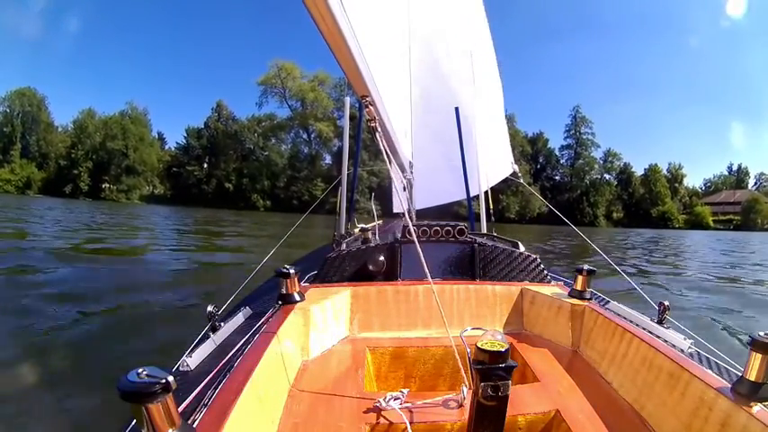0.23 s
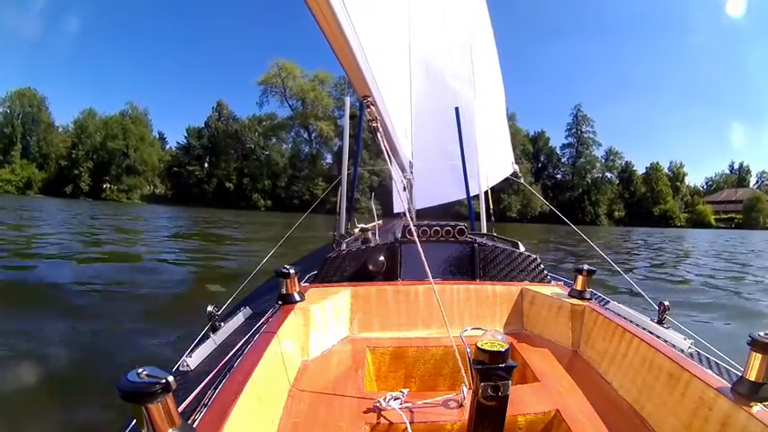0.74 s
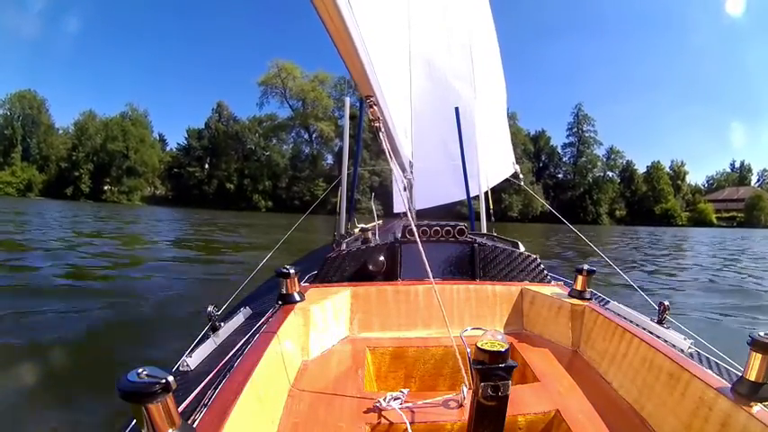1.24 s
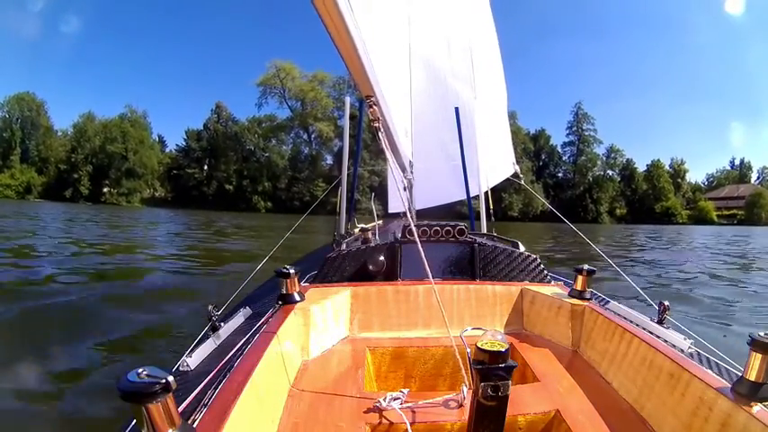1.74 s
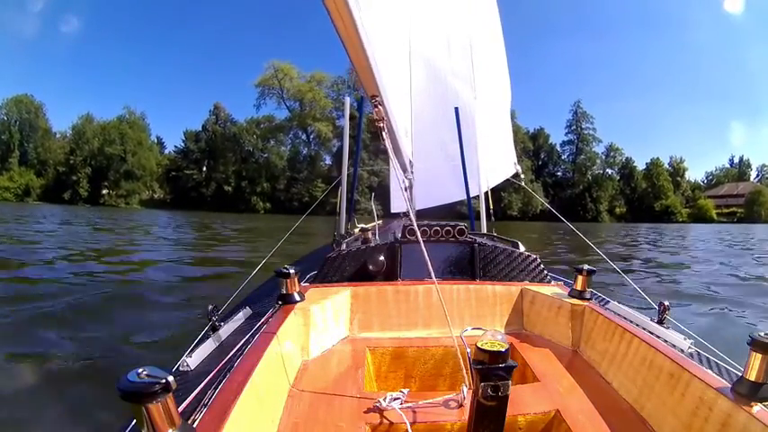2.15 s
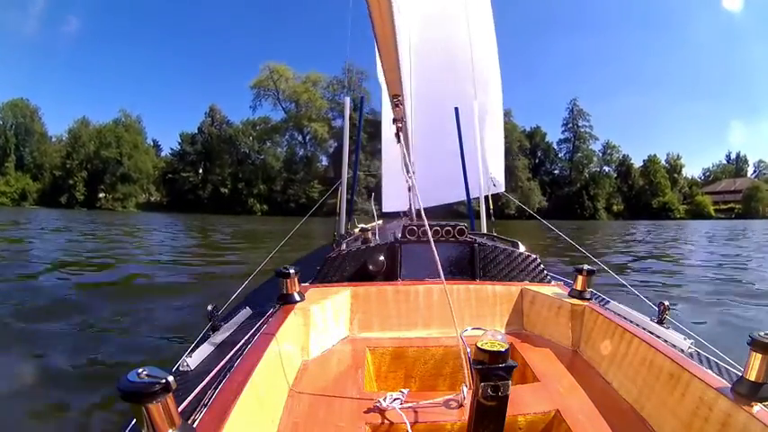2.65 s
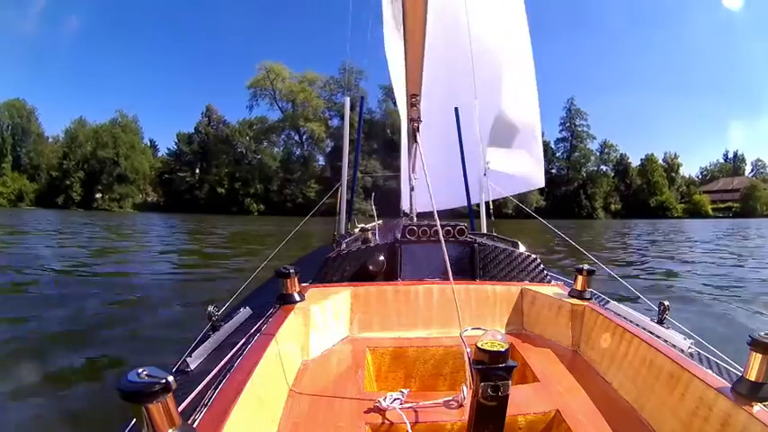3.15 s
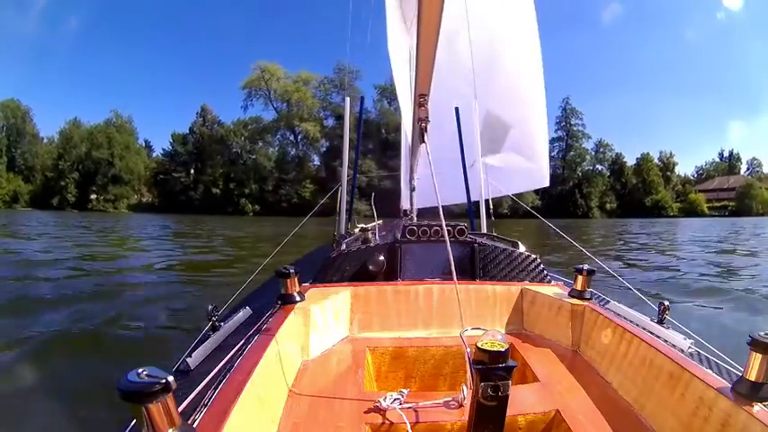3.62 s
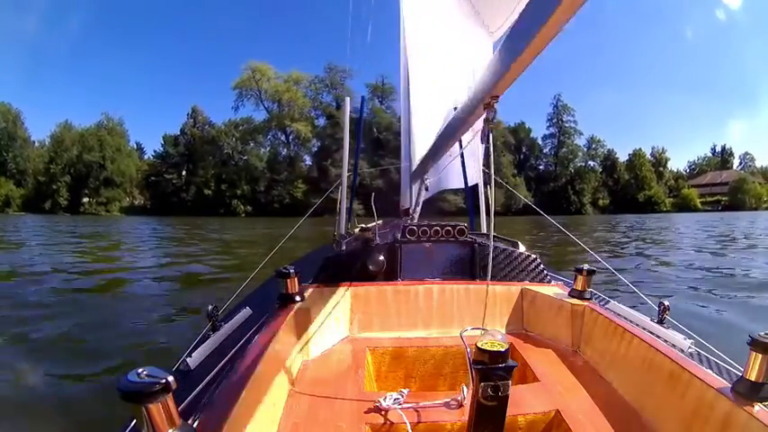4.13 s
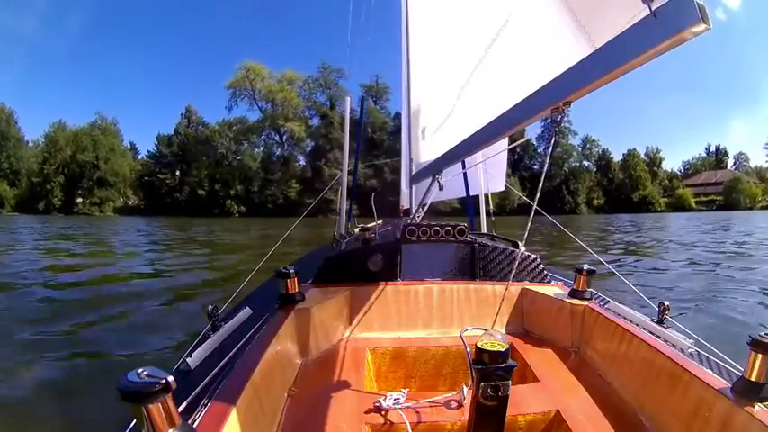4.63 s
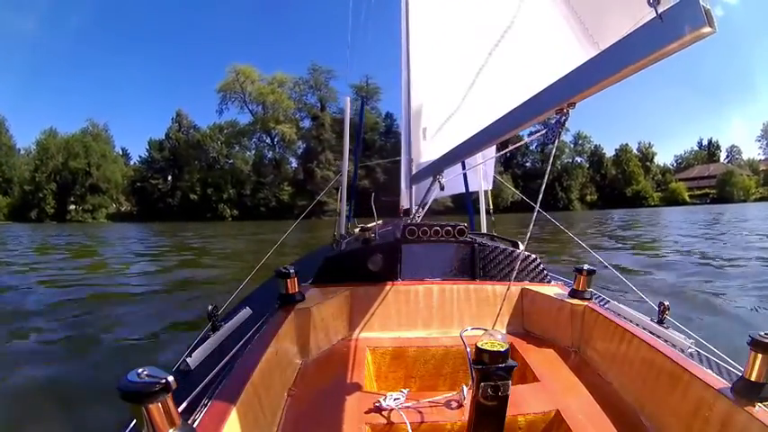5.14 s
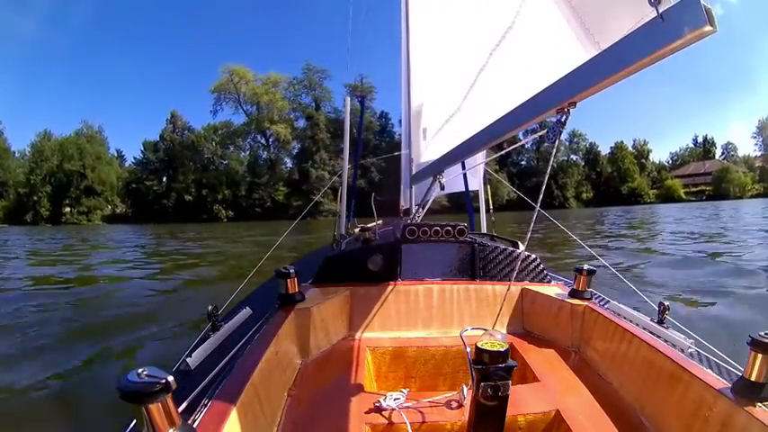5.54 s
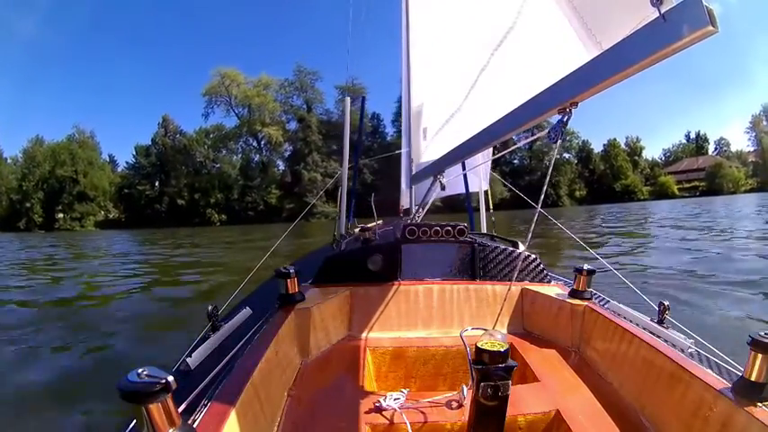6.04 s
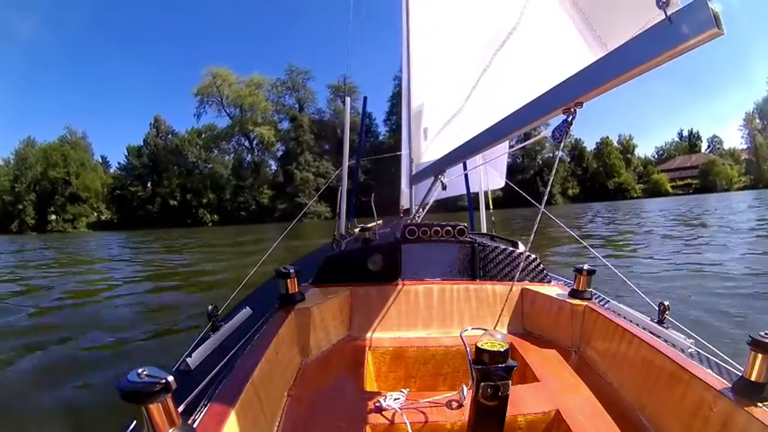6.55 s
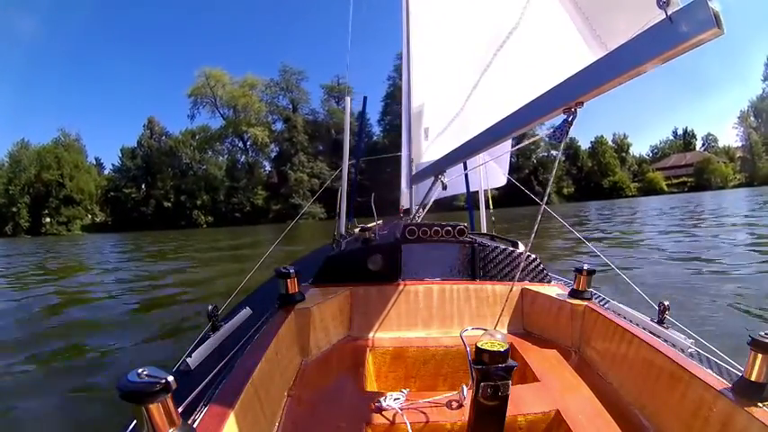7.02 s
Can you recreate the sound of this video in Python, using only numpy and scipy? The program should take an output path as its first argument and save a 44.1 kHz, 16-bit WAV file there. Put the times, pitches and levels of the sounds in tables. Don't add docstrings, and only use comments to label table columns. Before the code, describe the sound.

Outdoors on a lake, close hull-borne sound: soft low water, thin hiss, one early rigging knock. A gritty geared motor buzzes in surges with quick plastic ticking while the rigging rattles, until the boom slams. It winds down, hunts in evenly spaced little jolts with one longer nudge, rests briefly, then pulls in with a high mesh whine, a stub, and a last cut-off burst.

```python
import sys
import numpy as np
from scipy import signal
from scipy.fft import rfft, irfft, next_fast_len
from scipy.io import wavfile
from scipy.ndimage import uniform_filter1d, map_coordinates

SR = 44100
rng = np.random.default_rng(int(sys.argv[2]) if len(sys.argv) > 2 else 0)


def wav_record(signal):
    frames = np.transpose(np.atleast_2d(signal))
    bounded = np.clip(frames, -1, 1)
    quanta = np.round(bounded * 32767).astype(np.int16)
    wavfile.write(sys.argv[1], SR, quanta)


def amplitude_ratio(level_db):
    exponent = np.asarray(level_db, float) / 20
    return 10 ** exponent


N = 321048
T = np.arange(N) / SR

# frequency in Hz, density in dB per Hz.
LAKE_COLOUR = [(15, -32), (25, -6), (55, 2), (107, -0.5), (210, -6.5), (290, -4.5), (323, -9), (458, -12.5),
               (600, -15.5), (1150, -16.5), (1310, -19), (15600, -35)]
# time in seconds, level in dB.
LAPPING = [(0, -51.5), (.4, -53), (.8, -54.5), (1.2, -55), (5.7, -53.5), (6, -55), (7.28, -54)]
# frequency in Hz, level in dB.
CAMERA_WHISTLE = [(14104, -100)]
# start in seconds, crack peak in dB, panel re crack in dB,
# crack t60 in seconds.
JOLTS = [(0.308, -48.5, 1, 0.055), (.58, -32.5, -45, 0.015), (0.585, -33, -14, 0.053),
         (5.625, -46.5, 8, 0.045), (2.418, -25, -12, 0.023), (2.503, -21, -11, 0.038),
         (2.767, -20.5, -26.5, 0.044), (2.906, -21.5, -38, 0.028), (2.976, -20.5, -20, 0.039),
         (3.027, -16.5, -31, 0.016), (3.239, -20, -24, 0.042), (3.419, -23, -13, 0.23),
         (6.884, -47, -20, .04), (3.578, -32, -1, 0.045), (3.642, -26, -14, 0.067),
         (3.872, -8.5, -17.5, 0.018), (3.876, -11, -20, 0.015), (3.882, -23.5, 0, 0.055),
         (4.225, -26, -19, .03), (6.173, -31, -24, 0.25), (7.065, -38, -17, 0.034), (3.964, -38, -22, 0.03),
         (4.286, -46, -28, 0.027), (4.806, -49, -8.5, 0.047), (4.987, -44, -20, 0.025),
         (5.276, -30.5, -20, 0.048), (5.337, -28, -2.5, 0.11), (5.915, -46.5, -1, 0.054),
         (6.679, -35, -8.5, 0.021), (7.088, -19, -30, 0.027)]

# centre in Hz, width in Hz, level in dB.
HULL_MODES = [(101, 25, 0)]
# centre in Hz, width in Hz, level in dB.
ROCKING_MODES = [(40.3, 51, 0)]
# centre in Hz, width in Hz, level in dB.
PANEL_MODES = [(136, 59, -4.5), (208, 32, -3.5), (256, 41.3, 3.5), (292, 63, -7), (336.4, 53, -11.5)]
# centre in Hz, width in Hz, level in dB.
DECK_MODES = [(334.5, 21.5, -1), (425, 28, -5.5), (653, 180, -9.5), (807, 53, -11.5), (898, 86, -3.5),
              (1146, 153, 1.5), (1390, 142, 0), (1573, 43, -6.5)]
# centre in Hz, width in Hz, level in dB.
MOUNT_MODES = [(1797, 214, -3), (1995, 123, -3), (2129, 54.6, -3.5), (2264, 98, -16)]
# centre in Hz, width in Hz, level in dB.
CASE_MODES = [(2926.3, 123, 2), (3330, 55, -3), (3740, 87, 0.5), (4290, 330, -9.5)]
# centre in Hz, width in Hz, level in dB.
RING_MODES = [(3392, 300, 0.5), (4150, 77, 11.5), (4860, 530, -4), (5804, 210, 3.5), (6440, 190, -11)]
# centre in Hz, width in Hz, level in dB.
SNAP_MODES = [(7870, 1080, -10), (10100, 1250, -14), (11365, 430, -7)]

# time in seconds, turns done.
EASING = [
    [(2.008, -1.1), (2.1003, 0), (2.1736, 2), (2.2371, 4), (2.3657, 9), (2.4772, 13), (2.604, 17),
     (2.6805, 19), (2.765, 21)],
    [(2.8183, 22), (2.9389, 25), (3.002, 27), (3.1091, 31), (3.1696, 33), (3.3738, 39), (3.4553, 41)],
    [(3.8308, 47), (3.9762, 49), (4.0427, 50), (4.1606, 52), (4.2855, 54), (4.3597, 56), (4.4571, 58),
     (4.495, 58.6), (4.56, 58.8)],
]
# time in seconds, turns done.
NUDGE = [(5.215, .3), (5.2731, 1), (5.3455, 2), (5.4424, 3), (5.48, 3.3)]
# time in seconds, turns done.
HAULING = [
    [(6.172, .1), (6.2453, 1), (6.2748, 2), (6.299, 3), (6.4567, 10), (6.5295, 13), (6.5952, 15),
     (6.645, 15.6), (6.7, 15.66)],
    [(6.712, .5), (6.7372, 1), (6.7755, 2), (6.83, 2.9), (6.96, 2.97)],
    [(7.054, .85), (7.0642, 1), (7.108, 2), (7.1438, 3), (7.261, 8), (7.3, 9.7)],
]
# grind in dB, upper resonance re grind in dB, motor in dB, hum in dB.
LOADS = [
    (-34.5, -6, -34.5, -36.5),
    (-31, -6.5, -35, -34.5),
    (-37, -4, -34.5, -37.5),
    (-41, -5.5, -36, -41.5),
    (-36.5, -3.5, -33, -34),
]
GRIND_POWERS = [0.97, 1.43, 0.83, 0.99, 1.04]
# multiple of the shaft, level in dB.
MOTOR_ORDERS = [(4.999, -14), (6.75, -1)]
# multiple of the shaft, level in dB.
MESH_ORDERS = [(21, -30), (29, -25)]
# centre in seconds, level in dB, half length in seconds, pitch in Hz.
SWINGS = [(2.039, -31, 0.01, 101), (2.168, -35.5, 0.047, 100), (2.287, -38, 0.016, 101.5),
          (2.356, -31.5, 0.024, 100.7), (2.396, -41, 0.0154, 102), (2.636, -39, 0.06, 100.4),
          (3.02, -35.5, 0.044, 95.8), (3.116, -26.5, 0.027, 99.3), (3.277, -25.5, 0.035, 102.8),
          (3.504, -31, 0.012, 96.5), (3.647, -37, 0.013, 101), (3.728, -34.5, 0.0128, 100.3),
          (3.786, -27.5, 0.0091, 100.7), (3.903, -18.5, 0.0083, 104.3), (3.95, -27, 0.0245, 99.4),
          (4.046, -27, 0.0085, 101), (4.164, -31, 0.0093, 97.83), (4.236, -34.5, .015, 100),
          (4.329, -32, 0.034, 99.8), (4.435, -36, 0.01, 97), (5.358, -33, 0.013, 101),
          (6.204, -26, 0.0121, 101.9), (6.296, -34.5, 0.019, 100.2), (6.39, -29, 0.047, 93.14),
          (6.568, -25, 0.018, 105.3), (6.628, -29, 0.033, 101), (6.743, -33.5, 0.031, 105.3),
          (6.827, -40.5, 0.023, 101.6), (7.123, -31, 0.018, 99.9), (7.193, -26.5, 0.014, 94.3)]
# start in seconds, peak in dB, first and last pitch in Hz, fall in seconds,
# t60 in seconds.
BOOM_STOP = (3.876, -19, 800, 130, .007, .07)
# start in seconds, end in seconds, level in dB.
HOLDING = (4.53, 4.87, -40)
# start in seconds, grind peak in dB, push on hull in dB, grind t60 in seconds.
STEPS = [
    (4.571, -39, -32.5, 0.095),
    (4.766, -38.5, -38.5, 0.07),
    (4.872, -38, -31, 0.09),
    (4.974, -40, -31, 0.12),
    (5.072, -37.5, -33, 0.085),
    (5.214, -33, -32, 0.057),
    (5.413, -31, -39, 0.069),
    (5.511, -38.5, -31, 0.077),
    (5.612, -43, -33.5, 0.056),
]
# time in seconds, pitch in Hz, level in dB.
WHINE = [
    [(6.23, 1936, -50), (6.262, 1984, -31), (6.326, 2000, -36), (6.463, 2003, -35.5), (6.563, 2023, -56),
     (6.579, 2014, -48), (6.597, 1913, -53), (6.619, 1974, -65)],
    [(7.08, 1966, -40), (7.156, 1920, -54), (7.206, 2010, -34.5), (7.275, 1995, -37.5)],
]
# centre in seconds, level in dB, half length in seconds, pitch in Hz.
STRAIN = (6.525, -32, .045, 292)

FULL_SPEED_TURNS_PER_S = 40
HULL_REST_HZ = 100.5
HAULING_START_S = HAULING[0][0][0]


def unit(x):
    return x / np.sqrt(np.mean(x ** 2) + 1e-20)


def curves(tables):
    s, *cols = np.transpose(np.vstack(tables))
    inside = sum((T > rows[0][0]) & (T < rows[-1][0]) for rows in tables)
    return [np.interp(T, s, c) for c in cols] + [uniform_filter1d(1. * inside, size=300)]


def wobble(knots_per_s):
    coarse = T[::32]
    knots = rng.standard_normal(int(N * knots_per_s / SR) + 4)
    return np.interp(T, coarse, map_coordinates(knots, [coarse * knots_per_s]))


def filtered(x, response):
    m = next_fast_len(N + SR // 2)
    return irfft(rfft(x, m) * response(np.fft.rfftfreq(m, 1 / SR)), m)[..., :N]


def body(x, modes, skirt=0.17):
    f = np.fft.rfftfreq(2 ** 14, 1 / SR)

    def resonance(hz, width_hz):
        return 1j * f * width_hz / (hz * hz - f * f + 1j * f * width_hz)

    h = 0
    for k, (hz, width_hz, db) in enumerate(modes):
        h = h + (-1) ** k * amplitude_ratio(db) * resonance(hz, width_hz) * resonance(hz, width_hz + skirt * hz)
    ring = irfft(h)
    return signal.oaconvolve(x, ring / np.linalg.norm(ring))[:N]


def tone(hz, jitter_rad, knots_per_s):
    return np.sqrt(2) * np.sin(2 * np.pi * np.cumsum(hz) / SR + jitter_rad * wobble(knots_per_s))


def grit(grain_db, knots_per_s):
    return unit(rng.standard_normal(N) * amplitude_ratio(grain_db * wobble(knots_per_s)))


def bursts(start_s, db, rise_s, t60_s, hold=1):
    t = np.arange(int(SR * np.max(t60_s))) / SR
    shape = (1 - np.exp(-t / rise_s)) * amplitude_ratio(np.c_[db] - 60 * (t / np.c_[t60_s]) ** hold)
    at = np.round(np.c_[start_s] * SR).astype(int) + np.arange(len(t))
    return np.bincount(at.ravel(), shape.ravel(), N + SR)[:N] * rng.standard_normal(N)


def pushes(start_s, db):
    return np.bincount(np.round(start_s * SR).astype(int), amplitude_ratio(db), N)


def runs():
    return [np.transpose(rows) for rows in [np.vstack(EASING), NUDGE, *HAULING]]


def shaft_speed():
    return uniform_filter1d(sum(np.gradient(np.interp(T, *run)) for run in runs()) * SR, size=2000)


def effort(column, grows):
    total = 0
    for load, run, power in zip(LOADS, runs(), grows + np.zeros(len(LOADS))):
        speed = uniform_filter1d(np.gradient(np.interp(T, *run)) * SR, size=260)
        total = total + amplitude_ratio(load[column]) * np.abs(speed / FULL_SPEED_TURNS_PER_S) ** power * (speed > .1)
    return total


def lake():
    hz, db = np.transpose(LAKE_COLOUR)

    def colour(f):
        return f / (f + 30) * amplitude_ratio(np.interp(np.log(f + 1), np.log(hz + 1), db))

    def low(f):
        return 1 / (1 + (f / 1200) ** 2)

    floor = unit(filtered(rng.standard_normal(N), colour))
    lap_db = np.interp(T, *np.transpose(LAPPING))
    swell = amplitude_ratio(lap_db + .8 * wobble(8) + 1.2 * wobble(30))
    hiss = amplitude_ratio(-56) * filtered(floor, lambda f: 1 - low(f))
    whistle = sum(amplitude_ratio(level + 1) * tone(pitch + 0 * T, .6, 12) for pitch, level in CAMERA_WHISTLE)
    return swell * filtered(floor, low) + hiss + whistle


def jolts():
    s, db, panel_db, t60_s = np.transpose(JOLTS)
    t60_s = np.clip(t60_s, .01, .2)
    crack = bursts(s, db, 0.00036, t60_s, hold=1.34) + pushes(s + 0.00103, db + 18)
    bright = bursts(s, 1.2 * db - 23, 0.00014, t60_s)
    deck = amplitude_ratio(-9.5) * body(crack, DECK_MODES, skirt=0.15)
    mount = amplitude_ratio(-13.5) * body(crack, MOUNT_MODES, skirt=0.36)
    case = body(bright, CASE_MODES, skirt=0.153)
    panels = body(pushes(s + 0.0023, db + panel_db + 27.5), PANEL_MODES, skirt=0.24)
    return deck + mount + case + panels


def motor_starts():
    start_s = np.array([run[0, 0] for run in runs()]) + 0.00845
    return body(pushes(start_s, -17 + 0 * start_s), PANEL_MODES, skirt=0.25)


def hum():
    rebounds = [(s + .08, db - 7.5, .013, HULL_REST_HZ) for s, _, db, _ in STEPS]
    base = effort(column=3, grows=0.55) * amplitude_ratio(2.23 * wobble(16))
    gain = base.copy()
    pull = base * HULL_REST_HZ + 1e-6 * HULL_REST_HZ
    for s, db, length_s, hz in SWINGS + rebounds:
        near = slice(max(round((s - 4 * length_s) * SR), 0), round((s + 4 * length_s) * SR))
        swing = amplitude_ratio(db) * np.exp(-.5 * ((T[near] - s) / length_s) ** 2)
        gain[near] += swing
        pull[near] += swing * hz
    steady = .9 * amplitude_ratio(wobble(25)) * tone(pull / (gain + 1e-6), .4, 25)
    shaken = .3 * body(grit(1.5, 40), HULL_MODES, skirt=.8)
    rocking = amplitude_ratio(-41) * np.sqrt(gain) * body(grit(3.6, 18), ROCKING_MODES, skirt=.9)
    return gain * (steady + shaken) + rocking


def motor():
    line_share = 0.48
    speed = shaft_speed()
    start_s, end_s, hold_db = HOLDING
    holding = uniform_filter1d(1. * ((T > start_s) & (T < end_s)), size=900)
    held = amplitude_ratio(hold_db + 2.1 * wobble(42)) * holding
    lines = sum(amplitude_ratio(db + 1.0 * wobble(30)) * tone(k * speed, 0.68, 30) for k, db in MOTOR_ORDERS)
    drive = np.sqrt(line_share) * amplitude_ratio(-21.5) * lines + np.sqrt(1 - line_share) * grit(0.62, 60)
    hauling = amplitude_ratio(-1.5) * (T > HAULING_START_S)
    panels = body(drive, PANEL_MODES, skirt=0.1) + hauling * body(drive, PANEL_MODES[3:4], skirt=0.14)
    return (effort(column=2, grows=0.41) + held) * panels


def grind():
    starts_s = [run[0, 0] - .02 for run in runs()]
    run_now = np.clip(np.searchsorted(starts_s, T) - 1, 0, None)
    upper_db = np.transpose(LOADS)[1][run_now]
    speed, turns = shaft_speed(), 0
    for run in runs():
        s, count = run
        turns = turns + np.interp(T, s, count) - count[-1] * (T > s[-1]) - count[0] * (T < s[0])
    mesh = sum(amplitude_ratio(db + 4 * wobble(14)) * tone(k * speed, 0.93, 40) for k, db in MESH_ORDERS)
    swell_db = 0.5 * np.cos(2 * np.pi * (turns - .12))
    gain = effort(column=0, grows=GRIND_POWERS) * amplitude_ratio(0.75 * wobble(25) + swell_db)
    drive = gain * (grit(1.8, 200) + mesh)
    deck = amplitude_ratio(-0.5 * (T > HAULING_START_S)) * body(drive, DECK_MODES, skirt=0.2)
    mount = amplitude_ratio(upper_db) * body(drive, MOUNT_MODES, skirt=0.066)
    case = amplitude_ratio(-7 + 2.43 * upper_db) * body(drive, CASE_MODES, skirt=0.52)
    return deck + mount + case


def tick_rows(run, lag_turns, slip, first_db, second_db):
    s, turns = run
    n = np.arange(max(np.ceil(turns[0]), 0), turns[-1])
    late = n + np.minimum(lag_turns - slip * n, .72)
    late = late[(late > turns[0]) & (late < turns[-1])]
    at = np.r_[n, late]
    db = np.r_[first_db + 0 * n, second_db + 0 * late]
    speed = np.interp(at, (turns[1:] + turns[:-1]) / 2, np.diff(turns) / np.diff(s))
    db = db + 2.5 * np.log2(speed / FULL_SPEED_TURNS_PER_S)
    chance = rng.standard_normal((len(db), 2))
    return np.c_[np.interp(at, turns, s) + .001 * chance[:, 0], db + 1.6 * chance[:, 1]]


def teeth(ticks, snap_db, trade):
    s, ring_db = np.transpose(ticks)
    ring = bursts(s, ring_db, 0.000875, 0.016 + 0 * s)
    snap = bursts(s, snap_db - trade * np.clip(ring_db + 49.0, -4, 5), 0.00019, 0.0079 + 0 * s)
    ringing = amplitude_ratio(8.5) * body(ring, RING_MODES, skirt=0.31)
    snapping = body(snap, SNAP_MODES, skirt=.2) + amplitude_ratio(-0.5) * body(snap, CASE_MODES[:3], skirt=.2)
    return ringing + snapping + amplitude_ratio(17.5) * body(ring, DECK_MODES + MOUNT_MODES, skirt=0.14)


def gears():
    easing, nudge, *pulls = runs()
    eased = tick_rows(easing, .88, .0185, first_db=-45, second_db=-51.5)
    nudged = tick_rows(nudge, -.2, 0, first_db=-45, second_db=-51.5) - [0, 5]
    out = np.vstack([eased, nudged, [(4.9845, -47)]])
    back = np.vstack([tick_rows(pull, .34, 0, first_db=-46, second_db=-51.5) + [0, db]
                      for pull, db in zip(pulls, [0, -2.5, 0])])
    return teeth(out, -50.5, trade=-0.18) + teeth(back, -48, trade=0.26)


def boom():
    s, db, first_hz, last_hz, fall_s, t60_s = BOOM_STOP
    t = np.clip(T - s, 0, None)
    cycles = last_hz * t + (first_hz - last_hz) * fall_s * (1 - np.exp(-t / fall_s))
    return amplitude_ratio(db - 60 * t / t60_s) * (1 - np.exp(-t / 0.0028)) * np.sin(2 * np.pi * cycles)


def steps():
    s, db, hull_db, t60_s = np.transpose(STEPS)
    grit_burst = bursts(s, db, 0.00053, np.clip(t60_s, .02, .2), hold=1.93)
    torque = pushes(s + 0.00932, hull_db + 31) - pushes(s + 0.054, hull_db + 23)
    on = np.cumsum(pushes(s + .007, hull_db + 1) - pushes(s + .048, hull_db + 1))
    swing = uniform_filter1d(on, size=450) * tone(HULL_REST_HZ + 0 * T, .3, 20)
    kick = amplitude_ratio(-9.0) * body(torque, PANEL_MODES, skirt=0.33)
    rattle = body(bursts(s + 0.0046, hull_db - 4.5, 0.0041, 0.25 + 0 * s), PANEL_MODES, skirt=0.21)
    return amplitude_ratio(-10.5) * body(grit_burst, DECK_MODES + MOUNT_MODES, skirt=0.71) - (swing + kick) + rattle


def whine():
    hz, db, on = curves(WHINE)
    return on * amplitude_ratio(db - 1 + 2 * wobble(120)) * tone(hz, .7, 120)


def strain():
    s, db, length_s, hz = STRAIN
    return amplitude_ratio(db + 2.1 * wobble(30) - 5.0 * ((T - s) / length_s) ** 2) * tone(hz + 0 * T, 0.78, 30)


def scene():
    servo = motor_starts() + hum() + motor() + grind() + gears() + steps() + whine() + strain()
    return (lake() + jolts() + boom() + servo)[None]


def top_cut(x):
    return signal.sosfilt(signal.butter(12, 15760, fs=SR, output="sos"), x)


def record(dry):
    return top_cut(dry)


dry = scene()
out = record(dry)
wav_record(out)
```